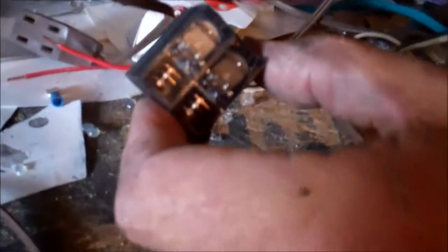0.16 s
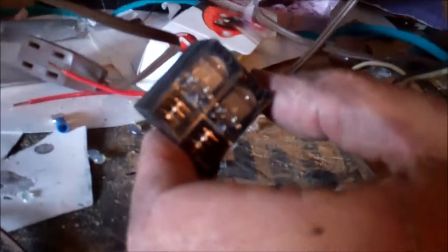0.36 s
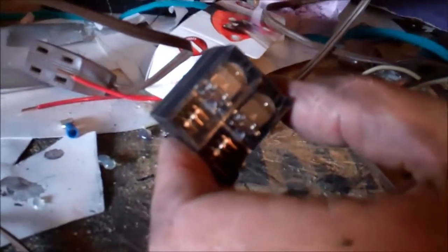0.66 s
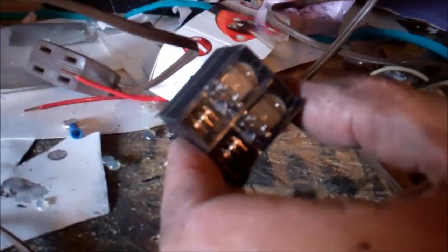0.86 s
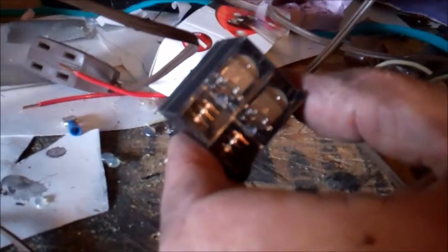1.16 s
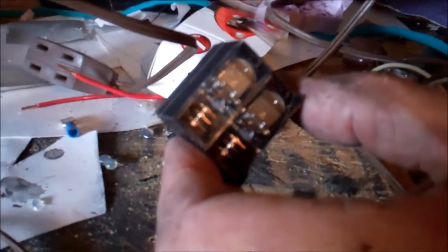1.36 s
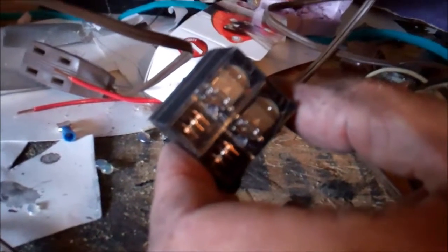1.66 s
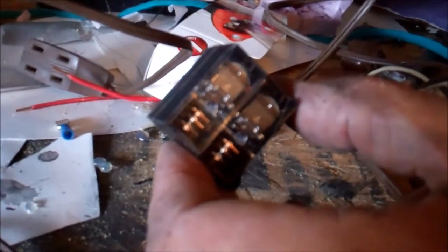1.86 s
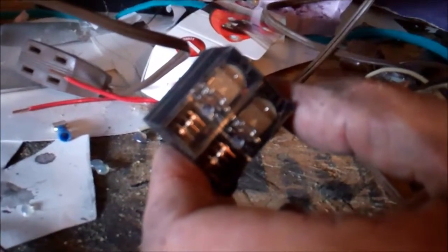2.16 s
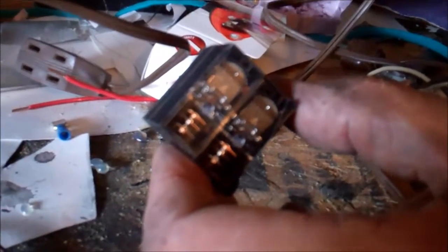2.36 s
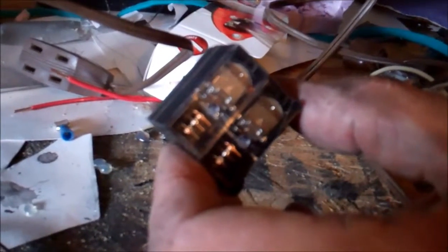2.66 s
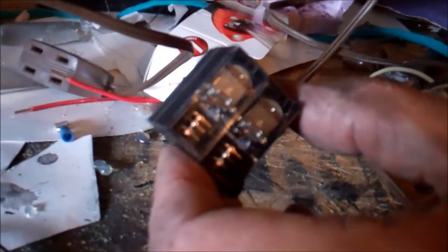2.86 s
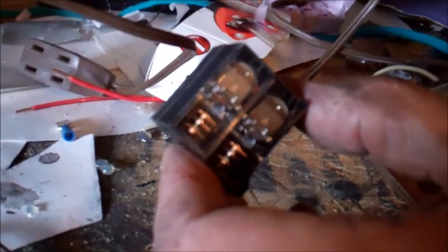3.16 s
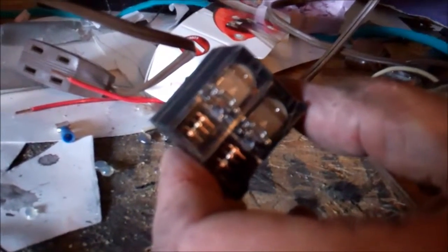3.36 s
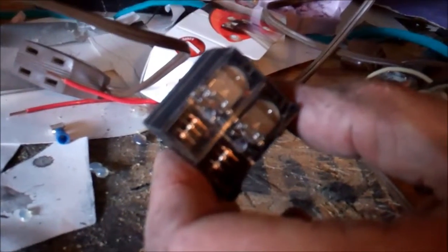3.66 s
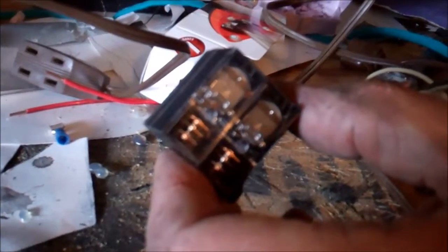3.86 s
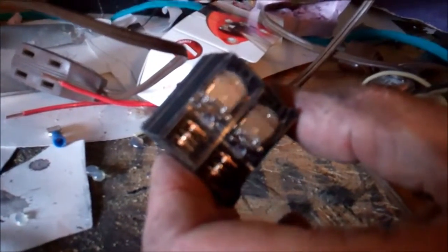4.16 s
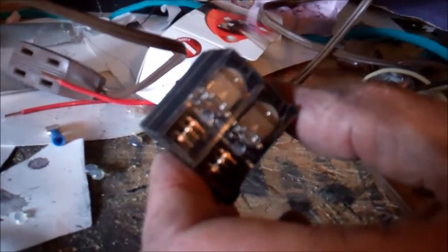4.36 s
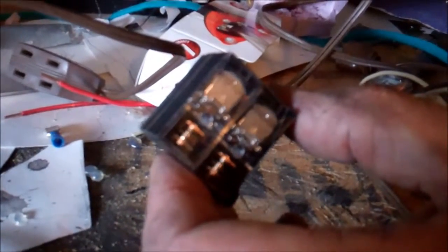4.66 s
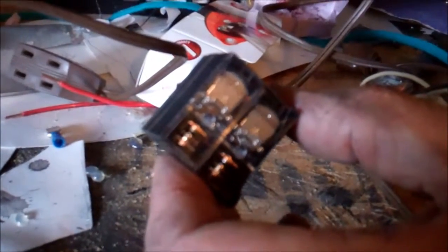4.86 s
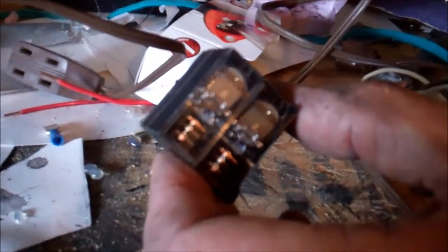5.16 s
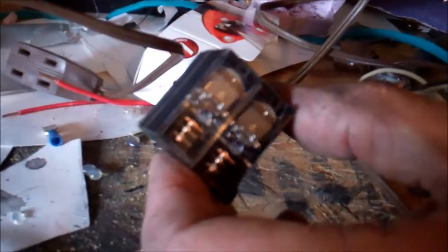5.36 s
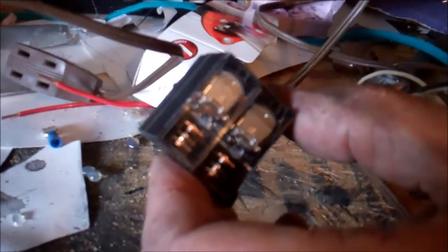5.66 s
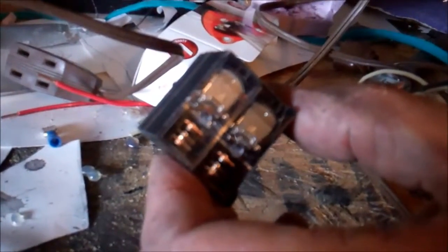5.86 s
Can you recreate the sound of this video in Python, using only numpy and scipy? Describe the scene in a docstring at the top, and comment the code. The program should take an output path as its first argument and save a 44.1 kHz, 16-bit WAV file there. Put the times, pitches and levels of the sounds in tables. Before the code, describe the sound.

A close, dry stereo scene at a workbench, louder on the right. Steady low room noise and soft hiss run throughout, with very faint, thin whistles wavering around 4 to 4.6 kHz and a fainter, higher steady whine. At about 1.5 seconds comes one small, crisp click with a tiny scrape. Between 2.9 and 3.3 seconds there are a few barely audible ticks. From about 4.15 seconds small ticks lead into a rapid, irregular burst of relay clicks lasting until about 4.75: very hard, bright snaps, softer releases with a short metallic ping, and thin wire fizz around 4.3 to 4.5. After a short pause, hard snaps resume from about 5.07 to 5.46, more widely spaced, with lighter ticks and another faint fizz near 5.4. The loudest strikes slightly overload and duck the background, which slowly returns as only hiss and whistles remain until 6 seconds.

```python
"""On a workbench, close to a camera's two microphone ports, a hand-held pair of small relays chatters as a wire
is touched to the coils. Armatures snap in with a dry crack and drop out with a short ping of the contact blade:
decaying noise coloured by the case, and beating sine modes. The wire ticks and fizzes, and the case creaks in
the fingers. Behind lie room noise and thin wavering whistles, both made of filtered noise. Gain control ducks
everything at loud strikes and recovers slowly."""
import sys
import numpy as np
from scipy import signal
from scipy.io import wavfile
from scipy.ndimage import uniform_filter1d

SR = 44100
rng = np.random.default_rng(int(sys.argv[2]) if len(sys.argv) > 2 else 0)


def transcribe(u):
    """Save the signal u as a 16-bit wav file named by the first command-line argument.

    u: samples, shape (n,) or (channels, n), limited to [-1, 1]; the rate is SR.
    q: integer samples, one column per channel.
    """
    v = np.clip(np.atleast_2d(u).T, -1, 1)
    q = np.round(v * 32767).astype(np.int16)
    wavfile.write(sys.argv[1], SR, q)


N = 264600  # length in samples

# Colour of the room noise and hiss. Each row: frequency in Hz, relative level in dB per Hz.
AIR_COLOUR = [(25, -16.5), (42, -17), (68, 10), (100, 2.5), (145, 2), (280, -3.5), (550, -0.5), (900, -1),
              (1700, -12.5), (3800, -14), (4500, -5.5), (5900, -13.5), (11500, -15.5), (14200, -11)]
AIR_DB = -50.5  # rms level at the right port
# Likeness of the room noise at the two ports. Each row: frequency in Hz, left-right correlation.
AIR_LIKENESS = [(60, 0.985), (180, 0.65), (550, 0.83), (1650, 0.21), (4970, -0.26), (15000, 0.14)]
# Room noise across the two ports. Each row: frequency in Hz, left minus right in dB.
AIR_BALANCE_DB = [(60, -6.5), (150, -6), (380, -7.5), (950, -6.5), (2380, -3.5), (5980, -3.5),
                  (15000, -4.0)]

# Whistle that drifts throughout. Each row: time in seconds, pitch in Hz, level of its thin line in dB.
DRIFTING_WHISTLE = [(0, 4530, -72.5), (.55, 4364, -64.5), (.85, 4350, -77), (1.3, 4360, -68),
                    (1.65, 4400, -77), (2.2, 4420, -64), (2.549, 4460, -79), (2.95, 4370, -62),
                    (3.1, 4376, -78), (3.13, 3990, -71), (4.05, 4390, -70), (5.449, 4380, -67.5),
                    (5.8, 4460, -66), (6, 4580, -71)]
# Whistles that swell briefly. Each row: middle in seconds, pitch in Hz, peak level of the thin line in dB.
WHISTLE_SWELLS = [(.15, 4600, -66), (.36, 4120, -68), (1.9, 4590, -64), (3.53, 4605, -64.5),
                  (5.75, 4615, -62.5)]
SWELL_S = .5  # length of each swell
WHINE_HZ, WHINE_DB = 7920, -76  # steady whine, level at the right port

# Decay of the room tail. Each row: frequency in Hz, time to fall by 60 dB in seconds.
ROOM_DECAY = [(300, .25), (3000, 0.52), (7000, 0.22), (14000, 0.202)]

# Wire scraping on the coil terminal. Each row: start in seconds, end in seconds, level in dB before fades.
WIRE_SCRAPES = [(1.498, 1.53, -51), (4.339, 4.502, -42), (4.512, 4.535, -21), (5.304, 5.464, -41)]
# Colour of the scraping. Each row: frequency in Hz, relative level in dB per Hz.
SCRAPE_RESPONSE = [(500, -31.5), (3000, -6.5), (6700, -1.5), (9000, -3.5), (12000, 2.5), (14000, -3)]

# Modes of the contact blade. Each row: frequency in Hz, relative level in dB, 60 dB decay in seconds.
BLADE_MODES = [(2726, 3.5, 0.15), (2780, -18, 0.27), (6470, -16, 0.054), (8800, -26.5, 0.072)]
# Armature, frame and plastic case together. Each row: frequency in Hz, relative level in dB per Hz.
CASE_RESPONSE = [(100, -41), (900, -27), (1400, -19), (1950, -12), (2400, -15), (3200, -10), (4500, -2.5),
                 (5500, -4), (6900, 0), (8500, -2.5), (9300, -5.5), (10800, 0.5), (13200, 0), (16000, -2.5)]

# Small ticks of wire and contacts, and from about 2.9 to 3.3 s creaks of the case in the fingers. Each row:
# start in seconds, level in dB, body in dB.
TICKS_AND_CREAKS = [(1.4882, -27, -12), (2.8577, -41.5, 7), (2.8789, -42, 2), (2.9401, -34.5, 20.5),
                    (2.9823, -41.5, 12), (3.136, -41, 16), (3.2596, -42, 6), (4.153, -24.5, -7),
                    (4.159, -26, 1), (4.2157, -23.5, 0.5), (4.278, -24, 12), (4.429, -26.5, 3),
                    (4.4345, -21.5, -6), (5.1112, -18.5, -4), (5.2528, -27, 8), (5.3904, -23.5, -6.5),
                    (5.4552, -23.5, -4)]
# Armatures striking the core. Each row: start in seconds, level in dB, body in dB,
# strongest frame mode in Hz.
ARMATURE_PULL_INS = [(1.4950, -16.5, 0, 5270), (4.2521, 7, 1, 4400), (4.2554, 1.5, -2, 3800),
                     (4.3317, -1.5, 1.5, 6370), (4.5012, -2.5, 7, 4600), (4.5080, 2, -4, 6400),
                     (4.595, -0.5, 5, 9400), (4.6267, -3.5, 1, 6240), (4.7448, 1, -2.5, 6400),
                     (5.0695, 7, 1.5, 5650), (5.2219, 4.5, 6.5, 6340), (5.3060, -2, 2, 6240)]
# Armatures springing back. Each row: start in seconds, level in dB, body in dB,
# strongest frame mode in Hz, blade ring in dB.
ARMATURE_DROP_OUTS = [(4.2225, 4.5, 4, 11170, -22), (4.2858, -2, -10, 4500, -33),
                      (4.536, -6, -14, 9560, -27.5), (4.607, -8.5, -4, 3350, -29.5),
                      (4.6863, -7.5, 0, 7160, -36), (4.7527, -7.5, 3, 5280, -31.5),
                      (5.1183, -1.5, -4.5, 7300, -35), (5.2783, -2.5, 1.5, 3370, -33),
                      (5.4625, -4, 4, 5500, -28.5)]

TICK_MS, TICK_TREBLE_DB = 2.1, -0.5  # decay and brightness shared by all ticks
PULL_IN_MS, PULL_IN_TREBLE_DB, PULL_IN_THUD_DB = 1.9, 4.5, 0  # decay, brightness and low thud at 0 dB
DROP_OUT_MS, DROP_OUT_TREBLE_DB, DROP_OUT_THUD_DB = 1.12, -1, -5  # the same for a drop-out
HALVING_DB = 10.5  # a blow this much harder settles in half the time
TREBLE_PER_DB = 0.2  # harder blows are brighter

# Shading of the direct clicks on their way to the left port. Each row: frequency in Hz, gain in dB.
LEFT_SHADING = [(500, -10.5), (1500, -7), (2300, -8), (3500, -9.5), (5500, -10.5), (7000, -14),
                (14000, -12.5)]
EDGE_HZ, SKIRT_HZ = 14250, 16400  # band limit, and its higher limit for loud peaks


def gain_of(db):
    """Decibels to amplitude."""
    return 10 ** (np.asarray(db) / 20)


def evened(x):
    """Scales to rms 1."""
    return x / np.sqrt(np.mean(x ** 2) + 1e-20)


def read(points, hz):
    """Reads a table on a log-frequency axis."""
    f, value = np.transpose(points)
    return np.interp(np.log(hz + 1), np.log(f + 1), value)


def add(mix, s, sound):
    """Mixes a sound in at time s."""
    part = mix[round(s * SR):][:len(sound)]
    part += sound[:len(part)]


def colour(x, points, size=1024):
    """Causal minimum-phase filter with the given response in Hz and dB."""
    log_gain = np.log(gain_of(read(points, abs(np.fft.fftfreq(size, 1 / SR)))))
    taps = np.fft.ifft(np.exp(signal.hilbert(log_gain).conj())).real
    return signal.fftconvolve(x, taps[:size // 2])[:len(x)]


def fuzzy_tone(hz, width_hz):
    """A narrow band of noise that follows the pitch curve hz."""
    n = len(hz)
    narrow = 1 / (1 + (np.fft.fftfreq(n, 1 / SR) / width_hz) ** 2)
    noise = rng.standard_normal(n) + 1j * rng.standard_normal(n)
    waver = np.fft.ifft(np.fft.fft(noise) * narrow)
    carrier = np.exp(2j * np.pi * np.cumsum(hz) / SR)
    return evened((waver * carrier).real)


def air(patch_db=1.0):
    """Steady room noise and microphone hiss, slightly patchy in time and pitch, partly alike at both ports."""
    frames, hz = N // 512 + 5, np.fft.rfftfreq(2048, 1 / SR)
    a, b, c, d, patches = rng.standard_normal((5, frames, len(hz)))
    patches = uniform_filter1d(patches, size=10, axis=0)
    patches = evened(uniform_filter1d(patches, size=20, axis=1))

    likeness = np.clip(read(AIR_LIKENESS, hz), -1, 1)
    right = a + 1j * b
    left = likeness * right + np.sqrt(1 - likeness ** 2) * (c + 1j * d)
    left = left * gain_of(read(AIR_BALANCE_DB, hz))
    spectra = np.array([left, right]) * gain_of(read(AIR_COLOUR, hz) + patch_db * patches)
    noise = signal.istft(spectra.transpose(0, 2, 1), nperseg=2048, noverlap=1536)[1][:, :N]
    return gain_of(AIR_DB) * noise / np.std(noise[1])


def whistles(width_hz=14, blur_hz=90, blur_db=-5, left_db=-5, whine_width_hz=14):
    """One faint, blurred whistle drifts throughout and others swell beside it, under a steady, higher whine."""
    def whistle(hz):
        """A thin line inside a wider blur."""
        return fuzzy_tone(hz, width_hz) + gain_of(blur_db) * fuzzy_tone(hz, blur_hz)

    t = np.arange(N) / SR
    times, pitch, level = np.transpose(DRIFTING_WHISTLE)
    out = gain_of(np.interp(t, times, level)) * whistle(np.interp(t, times, pitch))
    for s, hz, db in WHISTLE_SWELLS:
        near = abs(t - s) < SWELL_S / 2
        swell = np.cos(np.pi * (t[near] - s) / SWELL_S)
        out[near] += gain_of(db) * swell * whistle(np.full(near.sum(), hz))
    whine = gain_of(WHINE_DB) * fuzzy_tone(np.full(N, WHINE_HZ), whine_width_hz)
    return (out + whine) * gain_of([[left_db], [0]])


def room(x, room_db=-24, bench_db=-19, bench_t60=0.059):
    """Quick scatter from the cluttered bench and a faint room tail, different at each port."""
    hz, t, z = signal.stft(rng.standard_normal((2, SR // 2)), SR, nperseg=256)
    decay = gain_of(-60 * t / read(ROOM_DECAY, hz)[:, None])
    tail = signal.istft(z * decay, SR, nperseg=256)[1]

    t = np.arange(tail.shape[1]) / SR
    sparse = rng.standard_normal(tail.shape) * (rng.random(tail.shape) < .05)
    scatter = sparse * gain_of(-60 * t / bench_t60)
    echo = gain_of(room_db) * tail / np.linalg.norm(tail[0])
    echo = echo + gain_of(bench_db) * scatter / np.linalg.norm(scatter[0])
    return signal.fftconvolve(x[None], echo, axes=1)[:, :N]


def scrape(seconds, slips_per_s=9000):
    """Dense tiny slips of the wire make a thin fizz."""
    n = round(seconds * SR)
    slips = rng.standard_normal(n) * (rng.random(n) < slips_per_s / SR)
    return evened(colour(slips, SCRAPE_RESPONSE)) * signal.windows.tukey(n, .4)


def blade(db, free_s, damped_s=.003):
    """The freed contact blade rings, its close pair of modes beating, until the next pull-in pins it."""
    t = np.arange(SR // 3) / SR
    ring = np.zeros(len(t))
    for hz, mode_db, t60 in BLADE_MODES:
        ring += gain_of(db + mode_db - 60 * t / t60) * np.sin(2 * np.pi * hz * t)
    return ring * np.exp(-np.maximum(t - free_s, 0) / damped_s)


def snap(db, body_db, treble_db, decay_ms, mode_hz=4500, thud_db=2, mode_db=-3, mode_width_hz=420,
         crack=1.0, crack_ms=0.16, bounce=1.0, bounce_ms=1.0, case_db=-23, case_ms=6, count=4):
    """A blow, mostly metal on metal, bounces ever more weakly; the dense modes of the case ring on briefly."""
    ms = np.arange(3000) * 1000 / SR
    touches = np.cumsum(bounce_ms * rng.uniform(.4, 1.4, count))[:, None]
    strength = bounce * np.exp(-touches / decay_ms / 2)
    bounces = strength * (ms > touches) * np.exp(-abs(ms - touches) / crack_ms)
    blow = np.exp(-ms / decay_ms) + crack * np.exp(-ms / crack_ms) + bounces.sum(0)

    ring = (blow + gain_of(case_db) * np.exp(-ms / case_ms)) * rng.standard_normal(len(ms))
    tone = [(900, thud_db), (1900, body_db / 2), (2800, body_db),
            (4200, 0.0023), (7000, 0.0073), (10000, treble_db)]  # Hz, dB
    ring = colour(colour(ring, CASE_RESPONSE), tone)
    # each point of contact favours one mode of the frame
    mode = signal.lfilter(*signal.iirpeak(mode_hz, mode_hz / mode_width_hz, SR), ring)
    ring = ring + gain_of(mode_db) * mode
    # at 0 dB the energy equals 4 ms at rms 1
    return gain_of(db) * ring / np.linalg.norm(ring) * np.sqrt(.004 * SR)


def armature(db, body_db, mode_hz, decay_ms, treble_db, thud_db):
    """A hard blow is short and bright; a soft one is duller and rattles longer."""
    brightness_db = treble_db + TREBLE_PER_DB * db
    settling_ms = decay_ms * 2 ** (-db / HALVING_DB)
    return snap(db, body_db, brightness_db, settling_ms, mode_hz, thud_db)


def relays():
    """All scrapes, ticks, pull-ins and drop-outs; each freed blade rings until the next pull-in."""
    out = np.zeros(N)
    for start, end, db in WIRE_SCRAPES:
        add(out, start, gain_of(db) * scrape(end - start))
    for s, db, body_db in TICKS_AND_CREAKS:
        add(out, s, snap(db, body_db, TICK_TREBLE_DB, TICK_MS))
    for s, *blow in ARMATURE_PULL_INS:
        add(out, s, armature(*blow, PULL_IN_MS, PULL_IN_TREBLE_DB, PULL_IN_THUD_DB))
    for s, *blow, ring_db in ARMATURE_DROP_OUTS:
        add(out, s, armature(*blow, DROP_OUT_MS, DROP_OUT_TREBLE_DB, DROP_OUT_THUD_DB))
        free_s = min([row[0] - s for row in ARMATURE_PULL_INS if row[0] > s], default=1)
        add(out, s, blade(ring_db, free_s))
    return out


def scene(indirect=1.0, detour_ms=2.5):
    """The relays face the right port; the left one hears them shaded and partly by way of the hand."""
    clicks = relays()
    ms = np.arange(400) * 1000 / SR
    detour = rng.standard_normal(len(ms)) * np.exp(-ms / detour_ms)
    by_hand = np.convolve(clicks, detour / np.linalg.norm(detour))[:N]
    left = colour(clicks + indirect * by_hand, LEFT_SHADING)
    direct = np.array([left, clicks])
    return air() + whistles() + room(clicks) * gain_of([[-5], [0]]) + direct


def record(dry, threshold_db=-16.5, range_db=12.0, recovery_db_per_s=51, ceiling=1.67, knee=0.61,
           lopsided=0.4, skirt_db=-21):
    """Fast gain control with slow recovery, lopsided overload on the peaks, then the band limit."""
    # the right port steers the gain of both; its peak level is held, then falls steadily
    power_db = 10 * np.log10(abs(uniform_filter1d(dry[1] ** 2, size=176)) + 1e-12)
    fall = np.arange(N) * recovery_db_per_s / SR
    held_db = np.maximum.accumulate(power_db + fall) - fall
    duck_db = np.clip(held_db - threshold_db, 0, range_db)
    x = dry / gain_of(uniform_filter1d(duck_db, size=64))

    x = ceiling * np.tanh(x / ceiling)
    # positive peaks flatten first, which adds a low knock to the hardest strikes
    x = x - lopsided * np.maximum(x - knee, 0)

    main, skirt = (signal.firwin(511, hz, window=("kaiser", 9), fs=SR) for hz in (EDGE_HZ, SKIRT_HZ))
    # mostly loud peaks spill over the band edge
    loudness = np.clip(uniform_filter1d(abs(x), size=64) / 0.0375, 0, 1)
    spill = gain_of(skirt_db) * x * loudness ** 2
    limited = signal.oaconvolve(x, main[None], "same")
    return limited + signal.oaconvolve(spill, (skirt - main)[None], "same")


dry = scene()
out = record(dry)
transcribe(out)
```